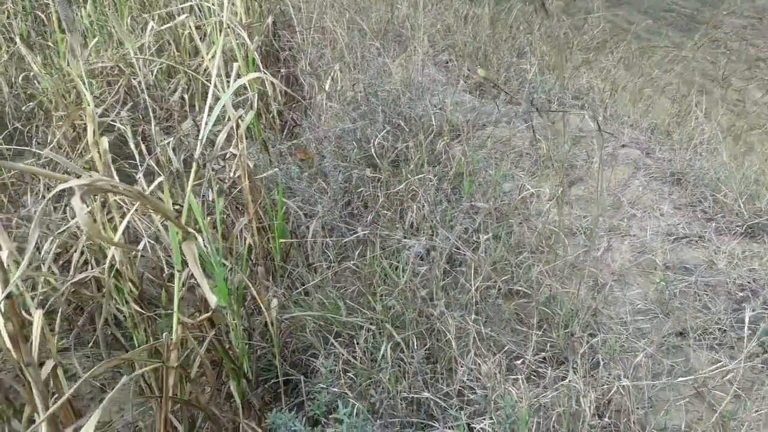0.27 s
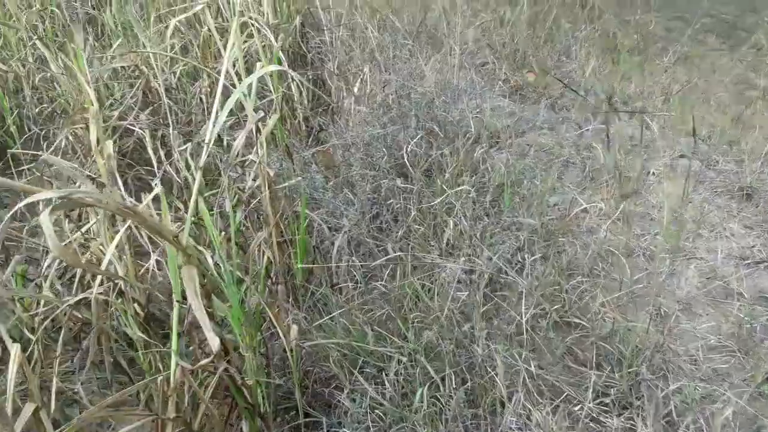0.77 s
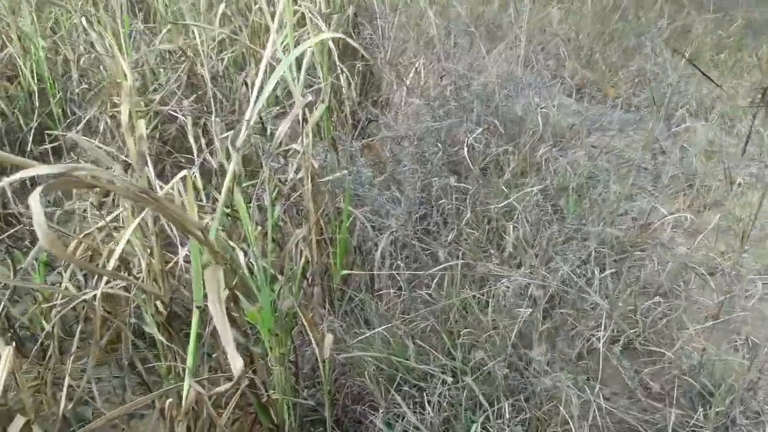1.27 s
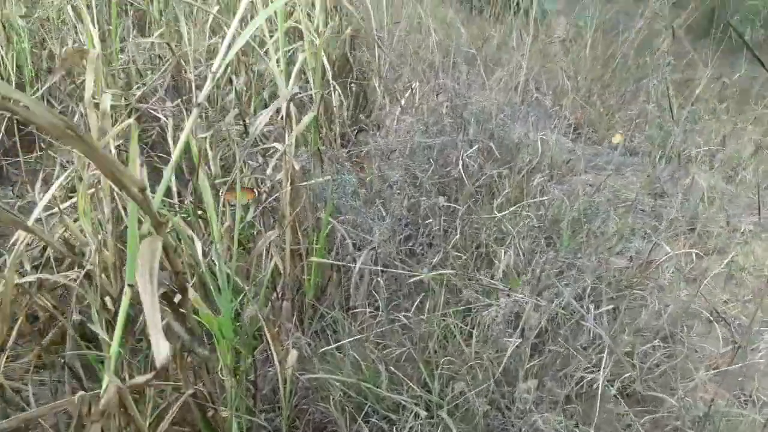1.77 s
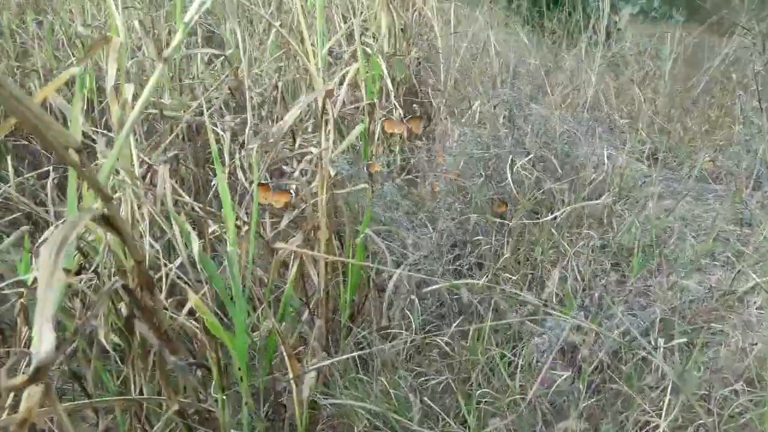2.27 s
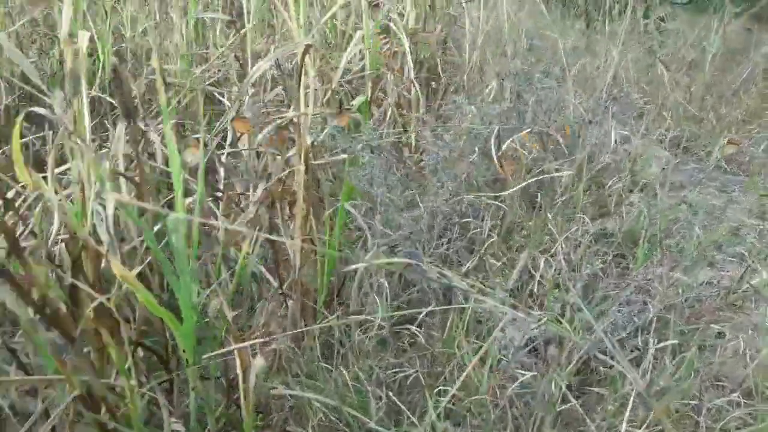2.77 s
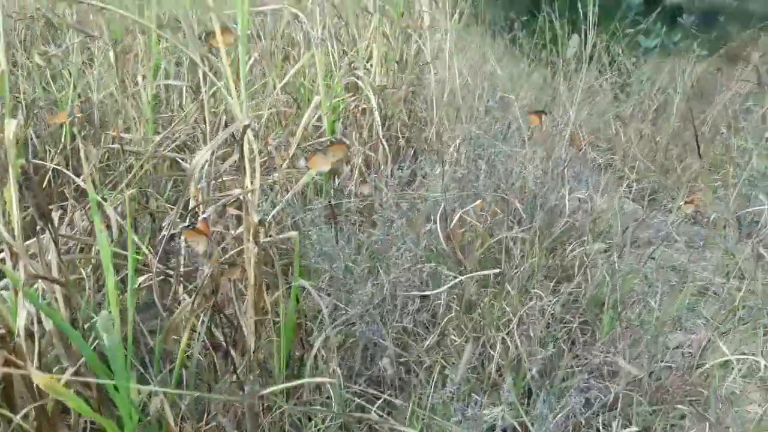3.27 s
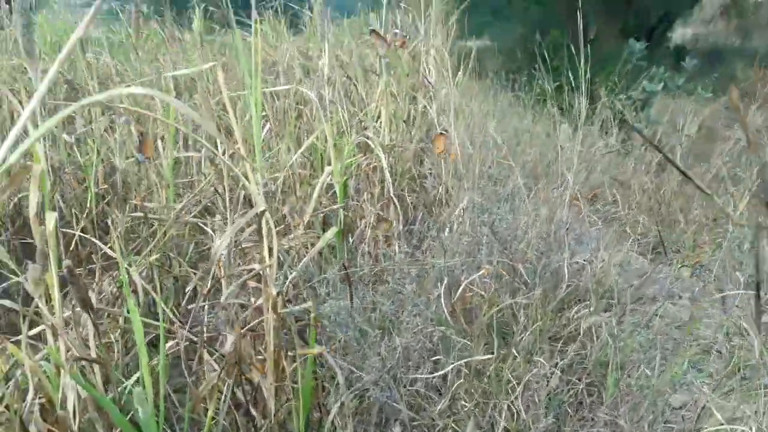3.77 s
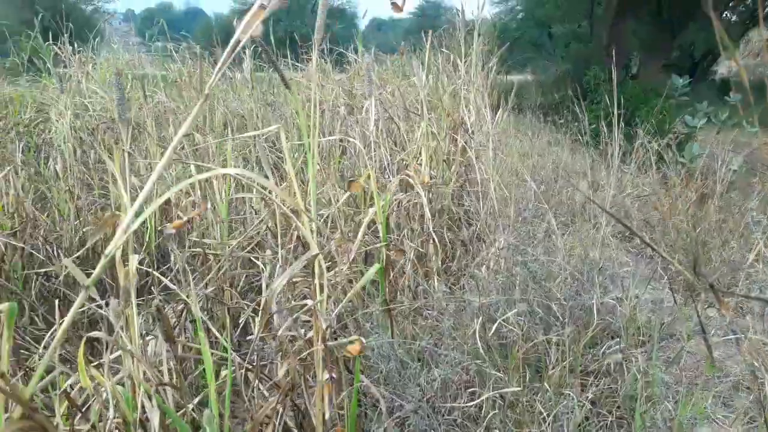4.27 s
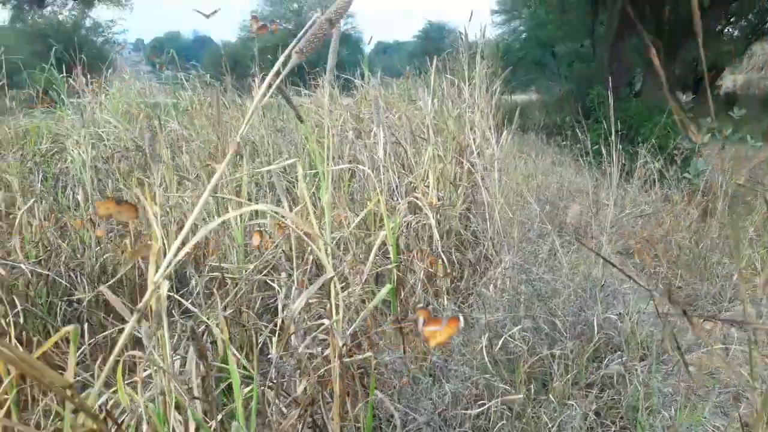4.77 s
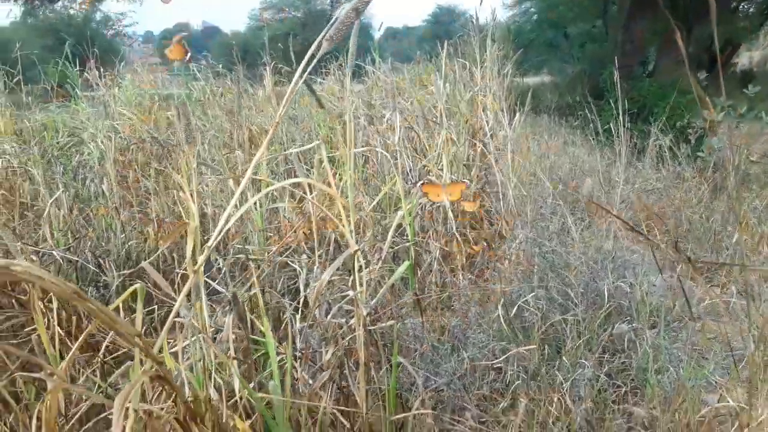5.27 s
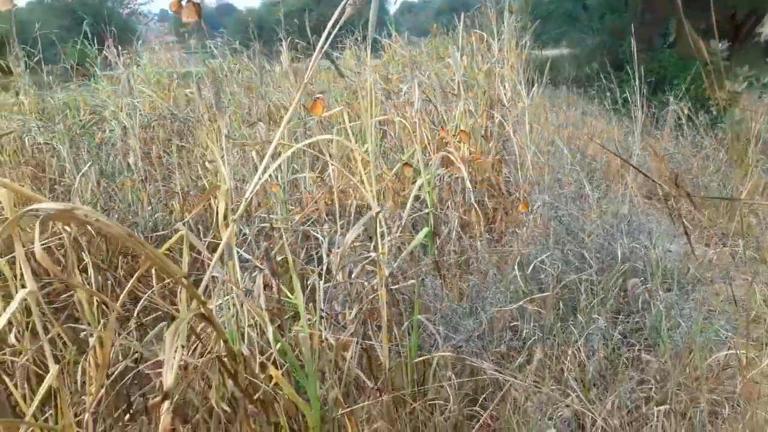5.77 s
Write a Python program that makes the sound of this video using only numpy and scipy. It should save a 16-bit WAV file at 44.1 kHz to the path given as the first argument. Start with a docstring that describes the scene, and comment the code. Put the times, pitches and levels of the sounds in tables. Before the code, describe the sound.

Dry blades rustle and crackle close by as someone moves through a field with a small microphone that takes a few soft knocks. A hollow stem rubs with a short, hoarse hoot at the start, then brittle stalks crack irregularly. One stalk drags across the microphone in a brief, louder scrape. Afterwards the rustling softens and a quick run of snaps follows. A faint rumble of open country lies underneath.

```python
"""Someone pushes through dry grass in an open field, carrying a small recorder. At once the housing
takes a soft bump, and a rubbed hollow stem hoots hoarsely as its air column resonates. Blades hiss and
crackle by friction throughout, while stalks snap and more bumps follow. At about 2.5 s a stalk is
dragged past the microphone and pulls taut. The brushing then grows quieter, with a cluster of snaps
between 4.4 and 5 s. The low rumble of open country lies under it all."""
import sys
import numpy as np
from scipy import signal
from scipy.fft import rfft, irfft, next_fast_len
from scipy.io import wavfile
from scipy.ndimage import uniform_filter1d, map_coordinates

SR = 44100
rng = np.random.default_rng(int(sys.argv[2]) if len(sys.argv) > 2 else 0)


def generate_wav(sig):
    """Save sig (samples, or channels by samples) to the path in sys.argv[1] as 16-bit PCM at SR."""
    pcm = np.round(np.clip(np.atleast_2d(sig).T, -1, 1) * 32767).astype(np.int16)
    wavfile.write(sys.argv[1], SR, pcm)


N = 265482

# response of the microphone port, notched near 4 kHz: (frequency [Hz], gain [dB])
PORT_RESPONSE = [(300, -12.5), (1000, -5), (2000, -0.5), (2650, -1), (3100, -15.5), (4200, -24.5),
                 (5200, -9.5), (6000, -6.5), (8000, -5.5), (9800, -13.5)]


def grass():
    """Stick-slip friction: leaves, thin blades and thick stalks share the catches of one brushing motion."""
    # the push: (time [s], leaf level [dB], blades over leaves [dB], stalks over leaves [dB])
    push = [(0, -48.5, -6, -3), (.35, -45.5, -5.5, -8), (.75, -47, -9, -9), (1.08, -44.5, -3, -12.5),
            (1.23, -52, -4, -2), (1.3, -47.5, -4, -12), (1.66, -50, -3, -7), (1.74, -43.5, -3.5, -10.5),
            (1.89, -46.5, -8, -9.5), (2.1, -46.5, -3, -7.5), (2.35, -41, -7.5, -15),
            (2.45, -48.5, -5.5, -4), (2.75, -50, -4.5, -6.5), (3.24, -49.5, -2, -11),
            (3.29, -52, -4.5, -8.5), (3.36, -54, -2.5, -7.5), (3.8, -57, -8, -2), (4.2, -55.5, -5.5, -5),
            (4.27, -53, -4, -9.5), (4.45, -56.5, -4.5, -2), (4.6, -57, -7.5, -6.5), (4.8, -58.5, -3, 0),
            (4.95, -55.5, -15.5, 1.5), (5, -56, -3.5, -2), (5.12, -60, -8, 5), (5.2, -54.5, -1.5, -4.5),
            (5.6, -58.5, -8.5, -5.5), (6.02, -56, -15.5, -7)]
    # friction spectra of leaves, blades and stalks: (frequency [Hz], relative spectral density [dB])
    leaf_spectrum = [(500, -10), (1200, -11), (1900, -2), (3500, -2.5), (5000, -18.5)]
    blade_spectrum = [(2500, -30), (3500, -4), (5000, -4.5), (10000, 1)]
    stalk_spectrum = [(150, -4.5), (400, -6.5), (700, -5), (1300, -2), (2200, -18.5)]
    leaf_db, thin_db, thick_db = curves(push)
    slip_db = 0.62 * wobble(9.8) + 0.18 * wobble(22) + 0.4 * wobble(60)
    contact = crackle(per_second=600, spread_db=4, share=0.16)
    brittle = crackle(per_second=110, spread_db=2.5, share=0.74)  # thin blades also tick on their own
    leaves = unit_at_port(coloured(patchy(contact, depth_db=0.8), leaf_spectrum))
    leaves *= amp(leaf_db + 0.89 * wobble(40))
    blades = unit_at_port(coloured(patchy(contact + 0.87 * brittle, depth_db=1.6), blade_spectrum))
    blades *= amp(leaf_db + thin_db + 1.7 * wobble(90) + 1.2 * wobble(10))
    stalks = unit_at_port(coloured(contact, stalk_spectrum))
    stalks *= amp(leaf_db + thick_db + 1.6 * wobble(30) + 1.3 * wobble(4.85))
    return amp(slip_db) * (leaves + blades + stalks)


def snaps():
    """Brittle fracture: tearing fibres give a damped burst near the stalk's pitch and a shorter crack."""
    # breaking stalks: (time [s], ring peak [dB], pitch [Hz], treble crack over ring [dB], T60 [s])
    fractures = [(.239, -24, 1960, -6.5, 0.017), (.95, -30.5, 2120, 5.5, 0.044),
                 (1.026, -29, 1090, 2.5, 0.078), (1.092, -27, 2160, 11, 0.024),
                 (1.285, -40.5, 2480, 14, 0.044), (1.68, -38.5, 2250, 9.5, 0.081),
                 (1.743, -26, 2440, 17, .025), (1.759, -37, 2100, 7.5, 0.025), (1.78, -28, 2340, 4.5, .03),
                 (1.84, -27, 1324, 12.5, 0.018), (1.957, -33, 2210, 20, .06),
                 (2.288, -23, 1740, 1.5, 0.022), (2.4, -32.5, 2350, 2.5, 0.04),
                 (2.598, -26.5, 2620, 25.5, 0.017), (2.681, -30, 1910, 6.5, .02),
                 (2.735, -32.5, 2160, 3, .027), (2.918, -32, 2340, 6, 0.021), (3.099, -29, 2490, 18, 0.045),
                 (3.242, -41.5, 2420, 25, 0.071), (3.262, -29, 2060, 25, 0.022),
                 (3.415, -35.5, 2490, 11.5, 0.057), (4.371, -32.5, 2200, 13, .03),
                 (4.398, -32.5, 1480, 0.5, 0.041), (4.48, -38, 1470, 6, 0.078),
                 (4.544, -39, 680, 9.5, 0.044), (4.582, -38.5, 1300, 8, .04), (4.62, -34, 1530, 5, 0.038),
                 (4.693, -38.5, 1500, 0, .04), (4.714, -48, 2040, 21, .04),
                 (4.816, -32.5, 2040, 10.5, 0.04), (4.821, -34.5, 1180, 2, .07),
                 (4.843, -35, 2020, 9, 0.02), (4.85, -32.5, 1480, 11, 0.04), (4.93, -36, 2120, 9, 0.032),
                 (4.947, -45.5, 1990, -9, .05), (4.99, -38.5, 1440, 19, .05),
                 (5.201, -36.5, 2320, 15, 0.03), (5.501, -40, 2370, 15, 0.033),
                 (5.54, -43.5, 1840, 21, 0.031), (5.656, -44, 2230, 17, .025), (5.857, -36, 1920, -2, .03),
                 (5.885, -37, 2250, 0, 0.022)]
    out, t = np.zeros(N + SR), np.arange(SR // 10) / SR
    treble = signal.butter(N=2, Wn=6000, btype="high", fs=SR)
    wide = signal.butter(N=1, Wn=[600, 3000], btype="band", fs=SR)
    attack = (1 - np.exp(-t / 0.00055)) * (1 + 0.67 * np.exp(-t / 0.0014))  # the first break is hardest
    for start, db, hz, treble_db, t60 in fractures:
        fibres, splinters = rng.standard_normal((2, len(t)))
        band = signal.butter(N=1, Wn=[.75 * hz, 1.25 * hz], btype="band", fs=SR)
        envelope = attack * amp(-60 * t / t60)
        tear = unit(signal.lfilter(*band, fibres)) + .7 * unit(signal.lfilter(*wide, fibres))
        ring = tear + 1.2 * np.sin(2 * np.pi * hz * t)
        crack = unit(signal.lfilter(*treble, splinters)) * amp(treble_db - 60 * t / (0.55 * t60))
        knock = amp(-3.5) * 2000 / hz * np.sin(2 * np.pi * 670 * t)  # thicker, lower stalks knock more
        burst = envelope * (ring / gain_at(PORT_RESPONSE, hz) + crack + knock)
        out[round(start * SR):][:len(t)] += amp(db) * burst / np.abs(envelope * ring).max()
    return out[:N]


def dragged_stalk():
    """Forced vibration: a stalk scrapes close by, and as it tightens its higher resonances take over."""
    # the scrape: (time [s], level [dB])
    scrape = [(2.461, -58), (2.466, -37), (2.49, -41), (2.505, -33.5), (2.53, -38), (2.542, -36),
              (2.575, -33), (2.586, -38), (2.597, -31), (2.605, -40.5), (2.614, -30), (2.624, -51)]
    # modes of the stalk, loose and taut: (frequency [Hz], bandwidth [Hz], relative gain [dB])
    loose_modes = [(1126, 112, 10.5), (1590, 110, 6), (2480, 990, -11.5), (5800, 500, 4.5)]
    taut_modes = [(1310, 1100, -25), (2780, 215, 9.5), (4800, 600, -1.5), (6020, 150, 8), (7170, 120, -2.5),
                  (7850, 460, 3)]
    tightening_s = (2.52, 2.532)
    taut_share = np.interp(np.arange(N) / SR, tightening_s, [0, .97])
    rub = crackle(per_second=540, spread_db=6, share=0.072) * amp(1.1 * wobble(150))
    loose = unit_at_port(resonant(rub, loose_modes) + 0.43 * rub)
    taut = unit_at_port(resonant(rub, taut_modes) + 0.43 * rub)
    return stroke_envelope(scrape) * (np.sqrt(1 - taut_share) * loose + np.sqrt(taut_share) * taut)


def hollow_stem():
    """Air-column resonance: rubbing excites the modes inside a stem, and the hoot sinks slightly."""
    # the rub along the stem: (time [s], level [dB])
    stroke = [(0.129, -47), (.18, -48), (.32, -41), (.43, -42), (.48, -38.5), (.53, -41.5), (.61, -49),
              (0.637, -38.5), (.67, -69)]
    # modes of the air column: (frequency [Hz], bandwidth [Hz], relative gain [dB])
    column_modes = [(226, 40, -13), (923, 100, -7), (1476, 42, 6), (1950, 86, -6), (2480, 120, -34.5)]
    sag = 0.035  # fractional fall in pitch over the stroke
    rub = crackle(per_second=210, spread_db=2.0, share=0.14) * amp(0.63 * wobble(45))
    high = unit(resonant(rub, [(hz * (1 + sag / 2), width, db) for hz, width, db in column_modes]))
    low = unit(resonant(rub, [(hz * (1 - sag / 2), width, db) for hz, width, db in column_modes]))
    crossfade = np.interp(np.arange(N) / SR, [stroke[0][0], stroke[-1][0]], [0, np.pi / 2])
    return stroke_envelope(stroke) * (np.cos(crossfade) * high + np.sin(crossfade) * low)


def housing_bumps():
    """Damped oscillation: each soft impact on the housing gives a brief swing and a dull puff."""
    # knocks on the housing: (time [s], peak level [dB], frequency [Hz])
    impacts = [(0.041, -38.5, 448), (1.168, -47, 340), (1.427, -39.5, 96), (1.882, -44.5, 150),
               (1.907, -44, 80.7), (2.189, -44.5, 243), (2.228, -42.5, 125), (2.4, -42, 61.3),
               (2.424, -45.5, 151), (2.94, -47, 80.7)]
    rise_s, t60_s = .003, 0.054
    out, t = np.zeros(N + SR), np.arange(SR // 10) / SR
    envelope = (1 - np.exp(-t / rise_s)) * amp(-60 * t / t60_s)
    for start, db, hz in impacts:
        band = signal.butter(N=2, Wn=[0.55 * hz, hz + 300], btype="band", fs=SR)
        puff = unit(signal.lfilter(*band, rng.standard_normal(len(t))))
        swing = envelope * (np.sin(2 * np.pi * hz * t) + 0.94 * puff)
        out[round(start * SR):][:len(t)] += amp(db) * swing / np.abs(swing).max()
    return out[:N]


def field_rumble():
    """Ambient noise: the low rumble of open country swells and flutters at random."""
    # the rumble: (frequency [Hz], relative spectral density [dB])
    spectrum = [(15, -27), (30, -20.5), (52, 5.5), (75, -4.5), (134, -11), (243, -5), (400, -15.5),
                (700, -21.5), (1000, -39)]
    level_db = -67 + 1.5 * wobble(2.4) + 1.3 * wobble(20)
    return amp(level_db) * unit(coloured(rng.standard_normal(N), spectrum))


def crackle(per_second, spread_db, share):
    """Shot noise: ticks of near blades carry `share` of the power, the hiss of far ones the rest."""
    sizes = amp(spread_db * np.minimum(rng.exponential(size=N), 3.1))
    impulses = (rng.random(N) < per_second / SR) * sizes
    tick_decay = np.exp(-np.arange(SR // 200) / SR / 0.00092)
    ticks = np.convolve(impulses, tick_decay)[:N]
    return np.sqrt(1 - share + share * unit(ticks) ** 2) * rng.standard_normal(N)


def patchy(x, depth_db):
    """Spectral modulation: single blades stand out for a moment, each in its own band."""
    spectra = signal.stft(x, nperseg=256)[2]
    patches = uniform_filter1d(rng.standard_normal(spectra.shape), size=10, axis=0)
    patches = uniform_filter1d(patches, size=9, axis=1)
    return signal.istft(spectra * amp(depth_db * unit(patches)), nperseg=256)[1][:N]


def amp(db):
    """Amplitude ratio of a level in decibels."""
    return 10 ** (np.asarray(db) / 20)


def unit(x):
    """Normalisation to rms 1."""
    return x / np.sqrt(np.mean(x ** 2) + 1e-20)


def unit_at_port(x):
    """Normalisation so that x has rms 1 once it has passed the microphone port."""
    return x / np.std(coloured(x, PORT_RESPONSE))


def gain_at(spectrum, hz):
    """Amplitude gain from (frequency [Hz], gain [dB]) points, interpolated in log frequency."""
    knots_hz, db = np.transpose(spectrum)
    return amp(np.interp(np.log(hz + 1), np.log(knots_hz + 1), db))


def curves(rows):
    """Linear interpolation: one value per sample for each column after the time."""
    times, *columns = np.transpose(rows)
    return [np.interp(np.arange(N) / SR, times, column) for column in columns]


def stroke_envelope(rows):
    """Amplitude envelope through (time [s], level [dB]) points, silent outside them."""
    t = np.arange(N) / SR
    db, = curves(rows)
    return amp(db) * ((t > rows[0][0]) & (t < rows[-1][0]))


def wobble(rate):
    """Random modulation: a smooth curve with `rate` knots a second."""
    return map_coordinates(rng.standard_normal(int(N * rate / SR) + 4), [np.arange(N) * rate / SR])


def filtered(x, response):
    """Linear filtering: the spectrum of x times a complex response of frequency."""
    size = next_fast_len(N + SR // 2)
    return irfft(rfft(x, size) * response(np.fft.rfftfreq(size, 1 / SR)), size)[..., :N]


def coloured(x, spectrum):
    """Zero-phase filtering by (frequency [Hz], gain [dB]) points."""
    return filtered(x, lambda hz: gain_at(spectrum, hz))


def resonant(x, modes):
    """Modal superposition: x drives second-order resonators of alternating polarity."""
    def response(f):
        return sum((-1) ** k * amp(db) * 1j * f * width / (hz * hz - f * f + 1j * f * width)
                   for k, (hz, width, db) in enumerate(modes))
    return filtered(x, response)


def scene():
    """Superposition: grass, snaps and scrape, coloured by the port, add to hoot, bumps and rumble."""
    vegetation = coloured(grass() + snaps() + dragged_stalk(), PORT_RESPONSE)
    return (vegetation + hollow_stem() + housing_bumps() + field_rumble())[None]


def record(dry):
    """Spectral imaging: raising a half-rate signal leaves a faint mirror of its treble above the band."""
    band_top_hz, image_top_hz = 9990, 13650
    baseband = filtered(dry, lambda hz: hz < band_top_hz)
    mirrored = baseband * (-1.) ** np.arange(N)  # reflects the spectrum about SR / 4
    image = coloured(mirrored, [(12000, -15.0), (13000, -36), (13600, -38)])
    return filtered(baseband + image, lambda hz: hz < image_top_hz)


dry = scene()
out = record(dry)
generate_wav(out)
```